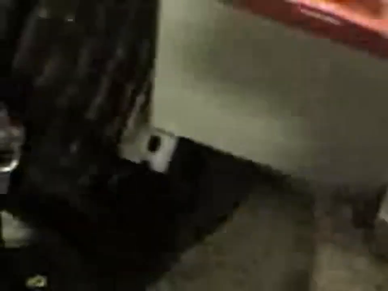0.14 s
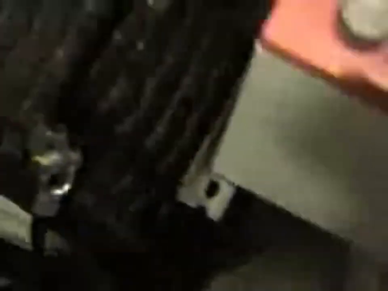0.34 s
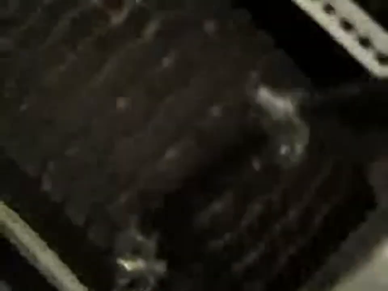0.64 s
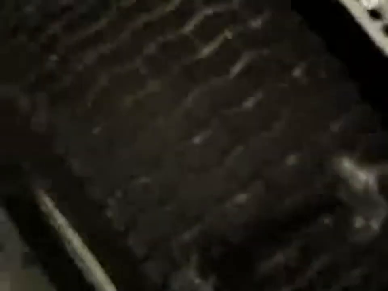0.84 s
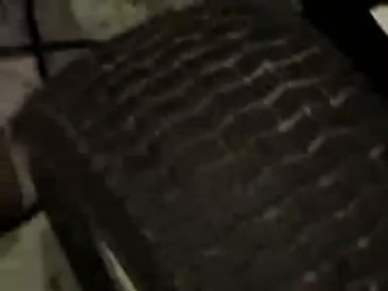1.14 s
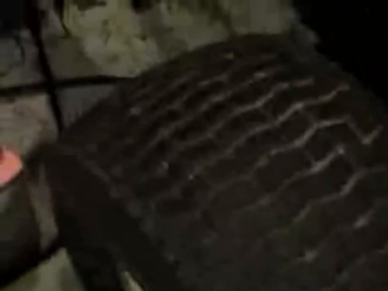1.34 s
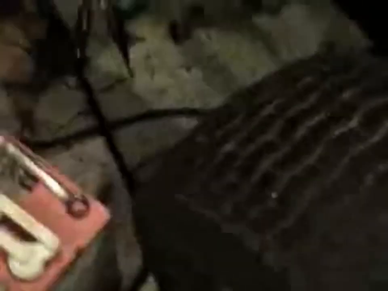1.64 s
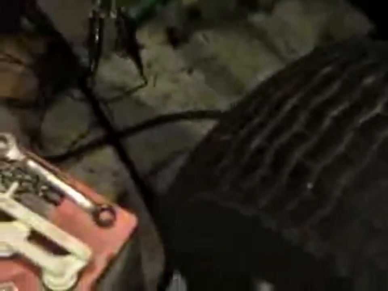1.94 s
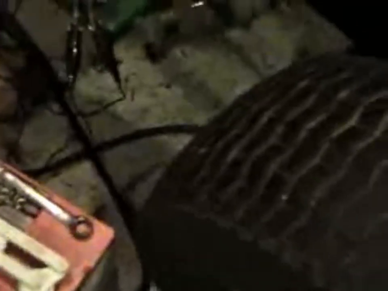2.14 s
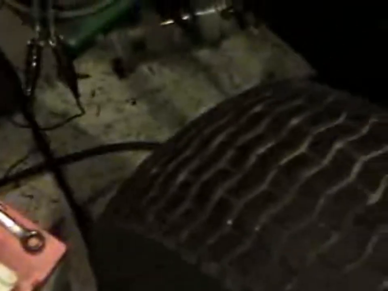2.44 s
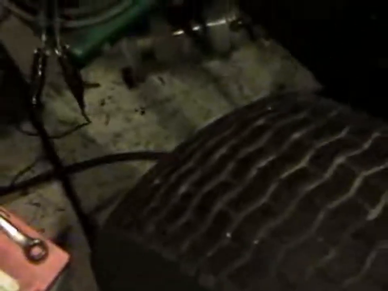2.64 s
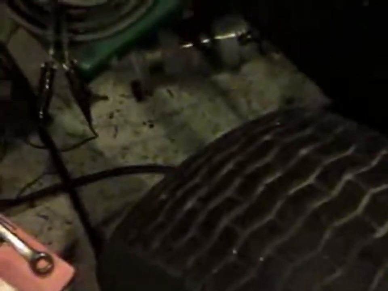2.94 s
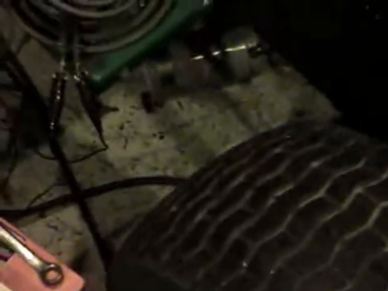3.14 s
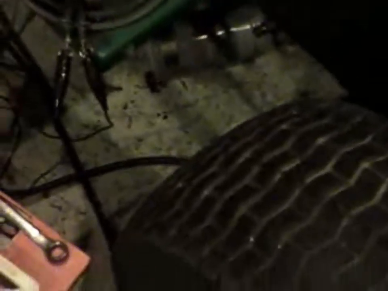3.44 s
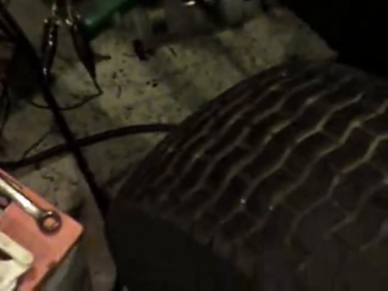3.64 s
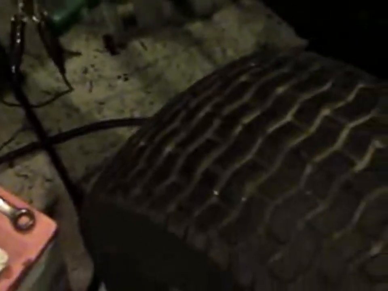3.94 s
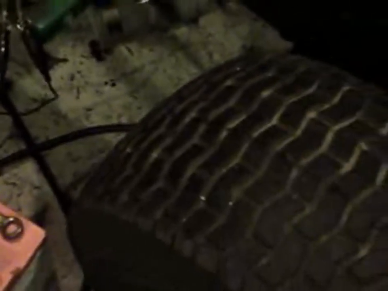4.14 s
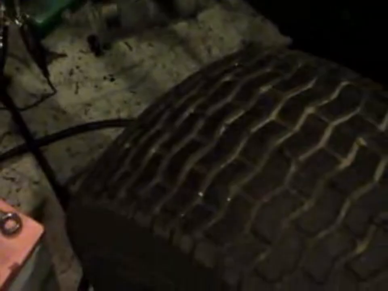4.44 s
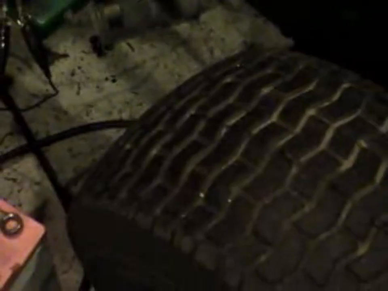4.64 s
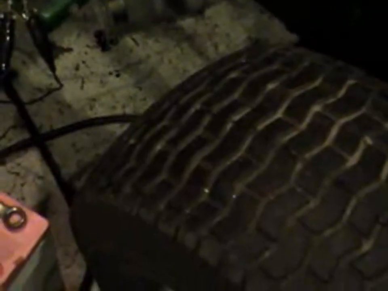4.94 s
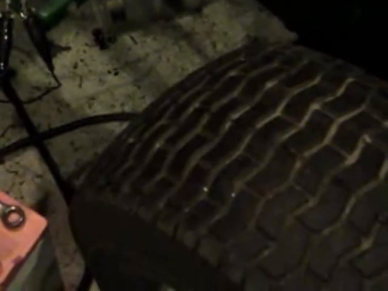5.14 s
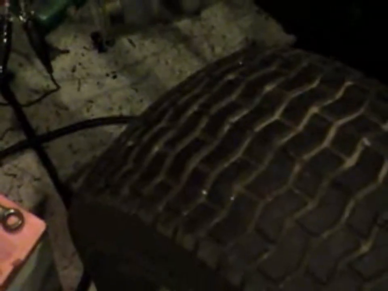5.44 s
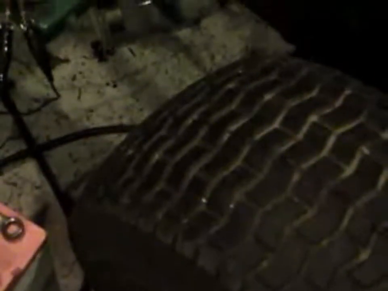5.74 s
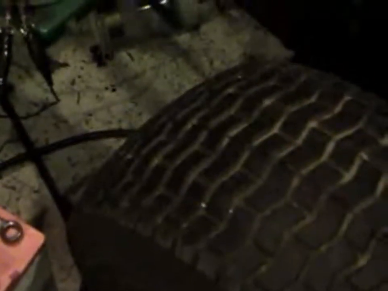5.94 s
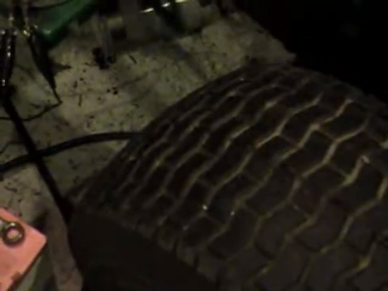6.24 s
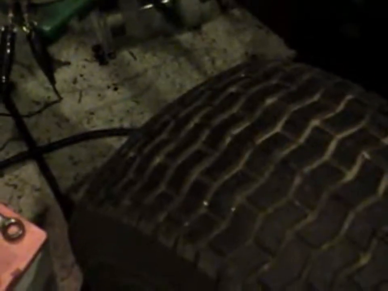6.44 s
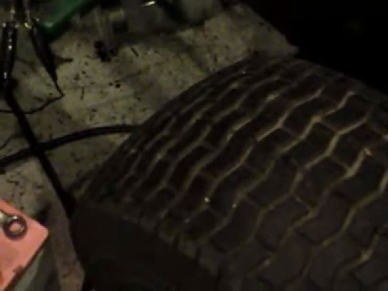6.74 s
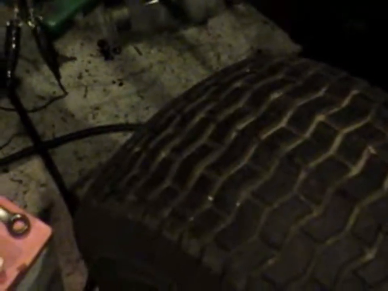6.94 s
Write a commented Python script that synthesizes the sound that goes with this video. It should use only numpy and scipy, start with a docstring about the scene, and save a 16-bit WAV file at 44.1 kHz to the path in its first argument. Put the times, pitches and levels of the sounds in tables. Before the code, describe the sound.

Close, dull-topped mono sound of a brushed motor turning slowly: mid-low hum, rubbing noise, repeated short growls, faint chirps and a few soft knocks.

```python
"""Quiet workshop: the brushed electric motor of a converted riding mower idles at about six turns a second.
Twenty armature slots pull on the poles and make a wavering hum: sines locked to the shaft angle.
Brushes rub, hiss and scuff (shaped noise), squeak near 6.2 kHz (short sines) and ring the housing (noise
through resonances), partly in a pattern that returns each turn. Short sines add a faint shimmer and brief high
chirps. A growl surges, dull knocks sound, the low mutter is at times quieter, a thrum comes and goes."""
import sys
import numpy as np
from scipy import signal
from scipy.fft import rfft, irfft, next_fast_len
from scipy.io import wavfile

SR = 44100
rng = np.random.default_rng(int(sys.argv[2]) if len(sys.argv) > 2 else 0)


def master(y):
    """Save y as 16-bit WAV."""
    cut = np.clip(np.atleast_2d(y).T, -1, 1)
    pcm = np.round(cut * 32767)  # scale
    wavfile.write(sys.argv[1], SR, pcm.astype(np.int16))


N = 313401
TIME_S = np.arange(N) / SR

# Levels are rms unless noted; "pre-trim" levels meet a fixed gain in their function.
# slot-passing rate: t/s, f/Hz
SLOT_RATE = [(0, 117.45), (1, 117.51), (5, 118.37), (6, 118.52), (6.5, 118.75), (7.11, 118.5)]
SLOTS = 20
# 3rd slot harmonic, the main note: t/s, level/dB
MAIN_NOTE = [(0.0, -39.5), (0.18, -39), (0.97, -40.5), (1.03, -36), (1.13, -39.5), (1.15, -37.5),
             (1.82, -39), (1.86, -33), (1.98, -44), (2.0, -41.5), (2.39, -38.5), (2.53, -38.5), (2.57, -50),
             (2.65, -39), (2.81, -49), (2.87, -38), (3.3, -41), (3.32, -49), (3.36, -41), (3.7, -42),
             (3.72, -38), (4.24, -42.5), (4.47, -36.5), (4.51, -43), (4.55, -37.5), (4.77, -44.5),
             (4.99, -36.5), (5.03, -51), (5.09, -40), (5.2, -38.5), (5.24, -35), (5.28, -41), (5.58, -37.5),
             (5.68, -47), (5.74, -33.5), (5.8, -47.5), (5.92, -38.5), (6.03, -50), (6.07, -40.5),
             (6.33, -39), (6.35, -53), (6.61, -37.5), (6.71, -48), (6.77, -41), (6.81, -57), (6.85, -45),
             (6.87, -43.5), (7.11, -46)]
# weaker slot harmonics: multiple of the slot rate
OVERTONES = (2, 4, 5)
# their levels as the microphone moves: t/s, 2nd, 4th and 5th harmonic level/dB (pre-trim)
OVERTONE_LEVELS = [(0, -67.5, -48, -48), (.6, -59, -47, -46), (1.4, -52.5, -67.5, -50.5),
                   (2.0, -59, -49.5, -49), (2.6, -55, -55, -51), (3.3, -54.5, -49, -50),
                   (3.9, -53, -44.5, -47.5), (4.6, -54, -56, -47.5), (5.7, -51, -55, -49.5),
                   (6.2, -52, -60, -44.5), (6.6, -49.5, -66, -51), (7.11, -61.5, -44, -48)]
# tones of the uneven armature: multiple of the shaft rate, level/dB
SHAFT_TONES = [(31, -63.5), (35, -61), (50, -63.5), (58, -63.5), (61, -73), (62, -52.5), (63, -61),
               (71, -58), (79, -57), (81, -60), (82, -61.5), (84, -50), (121, -62.5), (124, -68),
               (160, -71.5)]
# slot rate itself, throbbing once a turn; loudest at THROB_PLACE_TURNS
THROB_DB, THROB_DEPTH_DB, THROB_PLACE_TURNS = -67.5, 2, 0.091

# broad rubbing noise: f/Hz, level/(dB per Hz) (pre-trim)
RUB = [(175, -73.5), (200, -73.5), (275, -64), (400, -68), (560, -67.5), (735, -71.5), (790, -72.5),
       (825, -77.5), (890, -77), (975, -71.5), (1130, -75.5), (1250, -77.5), (1520, -74.5), (1750, -81.5),
       (2100, -82)]
# finer hiss: f/Hz, level/(dB per Hz) (pre-trim)
HISS = [(1900, -97), (2300, -86), (3100, -88), (3900, -94.5), (4400, -99.5), (5000, -97.5), (5900, -102),
        (7200, -103)]
RUB_FLUTTER_SPREAD_DB, RUB_FLUTTER_RATE_HZ = 0.5, 53

# low end of the rubbing: f/Hz, level/(dB per Hz) (pre-trim)
MUTTER = [(92, -86), (120, -76.5), (150, -74), (175, -75)]
# moments when the low noise is quieter: centre t/s, half length/s
QUIET_MOMENTS = [(.35, .015), (0.883, 0.053), (1.903, 0.011), (2.83, 0.017), (2.955, 0.017), (3.43, .035),
                 (3.96, .02), (4.062, .02), (4.18, 0.032), (4.546, .015), (4.838, 0.02), (5.283, .015),
                 (5.9, .012), (6.02, .025), (6.395, .02), (6.586, 0.036), (6.897, .035)]
QUIET_DEPTH_DB = 17.5

# shimmer chirps: the level is at each bell's peak and at the lowest pitch, falling with pitch
SHIMMER_PER_S, SHIMMER_HALF_S = 110, 0.028
SHIMMER_LOW_HZ, SHIMMER_HIGH_HZ, SHIMMER_DB, SHIMMER_FALL_DB_PER_OCTAVE = 1151.2, 4165, -55.5, 6.5
SHIMMER_SPREAD_DB, SHIMMER_GLIDE_SPREAD_HZ_PER_S = 2, 270

# housing resonances: f/Hz, width/Hz, level/dB before exposure, share repeating each turn (0-1)
HOUSING = [(322.5, 16, -57, 0.5), (366.6, 20, -55.5, 1), (443.4, 35, -52, 0), (472.2, 16, -53, 0),
           (508, 28.6, -49.5, 0.18), (530.5, 21, -46, 0), (943.7, 26, -59, 0), (1185, 51, -59, 0.9),
           (1312.5, 43, -58, 0.5), (1423, 53, -59.5, 0.05), (1914, 57, -59.5, 0.1), (2070, 40, -69, 0.01),
           (2828, 100, -72.5, 0.2), (3540, 46, -78, 0.8), (3910, 17, -76, 0.2), (4250, 46, -78, 0.5),
           (5356, 200, -70.5, 0.25)]
FLUTTER_SPREAD_DB, FLUTTER_RATE_HZ = 1.8, 20
# ringing that reaches the moving microphone: t/s, housing gain/dB, brush holder level/dB
EXPOSURE = [(0, -1, -58.5), (.5, 1, -47), (2.3, 1.5, -44.5), (4.5, 2, -46.5), (7.11, 2.5, -46)]
# commutator high spots: place/turns, half width/turns, added drag/dB re smooth drag
HIGH_SPOTS = [(0.019, 0.022, 0), (0.163, 0.035, 2.5), (.32, 0.018, -2.5), (0.549, 0.057, 3),
              (0.766, 0.032, 11.5), (0.853, 0.029, 8.5)]
HOLDER_ORDER = 182  # multiple of the shaft rate that meets the holder's resonance
HOLDER_DRAG_EXPONENT, GROWL_DRAG_EXPONENT = 0.85, 0.37

# thrum swells: half-rise t/s, length at half height/s, level/dB (pre-trim)
THRUM_SWELLS = [(0.007, 0.083, -64.5), (0.157, 0.046, -54), (0.278, 0.17, -53), (0.51, 0.074, -65),
                (0.62, 0.06, -63), (0.69, 0.03, -60), (0.758, 0.042, -56), (0.94, 0.042, -59.5),
                (1.052, 0.05, -55), (1.11, 0.04, -53), (1.46, 0.036, -57), (1.682, 0.037, -77),
                (1.78, 0.04, -59), (1.907, 0.06, -58), (2.03, 0.067, -60), (2.382, 0.053, -56),
                (2.517, 0.041, -55), (2.654, 0.07, -64), (2.774, 0.029, -57), (3.188, 0.042, -57),
                (3.31, 0.059, -62), (3.383, 0.2, -56.5), (3.745, 0.037, -56), (3.825, 0.054, -64),
                (3.92, 0.041, -53), (4.078, 0.045, -56), (4.47, 0.04, -58), (4.576, 0.08, -62),
                (5.52, 0.04, -58)]
THRUM_HZ, THRUM_EDGE_S = 64.7, 0.021
# rumble colour: f/Hz, relative level/(dB per Hz)
RUMBLE_COLOUR = [(22, -11), (45, -9), (65, -12), (92, -3)]
RUMBLE_START_DB, RUMBLE_FADE_DB_PER_S = -72, 1.2

# growl surges: peak t/s, peak rms level/dB (pre-trim), half length/s, f/Hz
SURGES = [(.162, -29, 0.015, 506), (0.443, -31, 0.02, 512), (0.488, -41, 0.017, 507),
          (0.784, -43, 0.023, 517), (1.804, -33, .035, 499), (2.03, -35.5, 0.014, 498),
          (2.108, -39, 0.015, 530), (2.488, -31, 0.014, 507), (2.532, -36, .02, 512.5),
          (2.731, -38, 0.011, 506), (3.355, -39, 0.019, 490), (3.405, -37, .018, 509),
          (3.495, -30, 0.015, 527), (3.583, -32, 0.015, 510), (3.823, -31.5, 0.025, 515),
          (4.031, -39, 0.022, 490), (4.155, -33, 0.023, 517.6), (4.37, -33.5, 0.012, 501),
          (4.503, -34.5, 0.023, 523), (4.545, -34.5, 0.013, 503), (4.875, -32, .018, 515),
          (5.01, -31, 0.016, 510.7), (5.256, -32.5, 0.025, 523), (5.397, -35, 0.031, 528),
          (5.559, -36.5, 0.014, 481), (5.868, -32.5, .014, 508), (6.112, -32.5, 0.038, 513),
          (6.2, -40, 0.019, 520), (6.409, -38, 0.019, 493), (6.523, -36.5, .022, 512.5),
          (6.613, -32, .021, 509), (6.752, -41, 0.013, 504.7), (6.881, -39, .022, 493)]
GROWL_WAVER_HZ = 12.06

# dull knocks: t/s, amplitude/dB before rise and decay
KNOCKS = [(.146, -27), (0.773, -21.5), (6.658, -24)]
KNOCK_HZ, KNOCK_RISE_S, KNOCK_DECAY_S = 486, 0.0019, 0.0059

# brush squeaks (rows near 6.2 kHz) and faint, brief high chirps (the other rows):
# peak t/s, f/Hz, level at peak/dB, half length/s
SQUEAKS_AND_CHIRPS = [(0.32, 4570, -69, .014), (0.616, 6140, -64, 0.013), (.99, 4480, -62, .014),
                      (1.018, 7070, -66, 0.015), (1.163, 4560, -61, .016), (1.404, 6700, -65, 0.018),
                      (1.48, 4750, -66, .015), (1.76, 4640, -67, 0.022), (2.121, 4680, -63, .013),
                      (2.247, 4600, -65, .014), (2.313, 4700, -62, .011), (2.441, 6170, -51, 0.011),
                      (2.458, 6260, -57, 0.025), (2.666, 4670, -72, 0.012), (2.86, 4600, -60, 0.013),
                      (3.035, 4760, -60, 0.016), (3.303, 6700, -71, .014), (3.626, 4770, -63, 0.016),
                      (3.816, 6150, -67, 0.011), (4.038, 4700, -60, .012), (4.11, 6280, -46.5, 0.0096),
                      (4.141, 6060, -56, 0.014), (4.182, 6200, -70, .025), (4.307, 4770, -68, .016),
                      (4.437, 6280, -54.5, 0.0064), (4.478, 6260, -61, 0.012), (4.612, 6100, -58, 0.0068),
                      (4.898, 4720, -67, .013), (5.117, 6200, -58, 0.011), (6.11, 4730, -62, 0.02),
                      (6.24, 4690, -61, 0.014), (6.695, 4700, -63, .014)]

# scuffs: half-rise t/s, length at half height/s, level/dB
SCUFFS = [(0.413, 0.025, -47.5), (0.566, 0.031, -40), (0.892, 0.019, -44), (1.3, 0.027, -49),
          (1.456, 0.044, -48), (1.614, .022, -47.5), (2.005, 0.02, -60), (2.085, 0.022, -41.5),
          (3.118, 0.018, -45.5), (3.675, 0.023, -48), (3.75, 0.032, -44.5), (3.92, 0.022, -45),
          (4.235, 0.031, -49), (4.766, 0.017, -44), (5.267, 0.019, -48), (5.395, 0.041, -50),
          (5.874, .02, -50.5), (6.457, .022, -43.5), (6.49, 0.038, -44.5), (7.068, 0.019, -43.5)]
# scuff colour: f/Hz, relative level/(dB per Hz)
SCUFF_COLOUR = [(600, -10), (1200, 10.5), (2300, 3.5), (3400, -5), (4300, -13.5)]
SCUFF_EDGE_S = 0.005

CUTOFF_HZ = 7270


def from_db(db):
    """Decibels to amplitude gain."""
    return 10 ** (np.asarray(db) / 20)


def rms_one(x):
    """Scale to an rms of 1."""
    return x / np.sqrt(np.mean(x ** 2) + 1e-20)


def in_time(rows):
    """Interpolate each column of a curve at every sample."""
    t_s, *columns = np.transpose(rows)
    return [np.interp(TIME_S, t_s, column) for column in columns]


def drift(rate_hz):
    """Random wander of spread 1: noise through two equal poles, run at SR / 40."""
    pole = np.exp(-2 * np.pi * rate_hz * 40 / SR)
    white = rng.standard_normal(N // 40 + 2002)
    slow = signal.lfilter([1], [1, -2 * pole, pole * pole], white)[2000:]  # skip the settling
    return np.interp(np.arange(N) / 40, np.arange(len(slow)), rms_one(slow))


def coloured(white, spectrum):
    """Give unit white noise a spectrum in dB per Hz, falling steeply beyond its ends."""
    hz, db = np.transpose(spectrum)
    size = next_fast_len(N)
    f_hz = np.maximum(np.arange(size // 2 + 1) * SR / size, 1)
    skirts = np.minimum(1, np.minimum(f_hz / hz[0], hz[-1] / f_hz)) ** 8
    density = from_db(np.interp(np.log(f_hz), np.log(hz), db))
    gain = density * skirts * np.sqrt(SR / 2)
    return irfft(rfft(white, size) * gain, size)[:N]


def patchy(x, low_hz, high_hz, spread_db, rate_hz, count):
    """Split a noise into bands, each fluttering at random."""
    size = next_fast_len(N)
    spectrum = rfft(x, size)
    f_hz = np.arange(size // 2 + 1) * SR / size
    band = np.searchsorted(np.geomspace(low_hz, high_hz, count - 1), f_hz)
    out = np.zeros(N)
    for k in range(count):
        out += irfft(spectrum * (band == k), size)[:N] * from_db(spread_db * drift(rate_hz))
    return out


def resonate(x, hz, width_hz):
    """A steep-sided resonance, already ringing at the start; rms 1."""
    edges_hz = [hz - width_hz / 2, hz + width_hz / 2]
    sos = signal.butter(2, edges_hz, "band", fs=SR, output="sos")
    primed = np.concatenate([x[-SR:], x])
    return rms_one(signal.sosfilt(sos, primed)[SR:])


def swell(peak_s, half_s):
    """A bell-shaped envelope of height 1."""
    return np.exp(-np.minimum(((TIME_S - peak_s) / half_s) ** 2 / 2, 30))


def plateau(start_s, length_s, edge_s):
    """An envelope that rises to 1, holds and falls; edges centred on start and end."""
    inside_s = np.minimum(TIME_S - start_s, start_s + length_s - TIME_S)
    return np.clip(inside_s / edge_s + .5, 0, 1)


def wavering(hz, waver_hz, rate_hz):
    """A sine whose pitch wanders at random; rms 1."""
    cycles = np.cumsum(hz + waver_hz * drift(rate_hz)) / SR
    return np.sqrt(2) * np.sin(2 * np.pi * (cycles + rng.random()))


def tone(turns, multiple, waver_db, jitter_rad):
    """A sine locked to the shaft, wavering in level and phase; rms about 1."""
    phase = 2 * np.pi * (multiple * turns + rng.random()) + jitter_rad * drift(15.0)
    return np.sqrt(2) * from_db(waver_db * drift(6.1)) * np.sin(phase)


def friction(turns, repeat):
    """White rubbing force: a share is surface roughness that returns each turn, the rest is fresh."""
    surface = rng.standard_normal(7400)  # points around one turn
    returning = surface[(turns % 1 * len(surface)).astype(int)]
    return np.sqrt(repeat) * returning + np.sqrt(1 - repeat) * rng.standard_normal(N)


def hum(turns):
    """Each slot tugs on the poles as it passes; unequal slots add shaft tones and a low throb."""
    main_db, = in_time(MAIN_NOTE)
    main = from_db(main_db) * tone(turns, SLOTS * 3, waver_db=0.5, jitter_rad=0.2)
    overtones = sum(from_db(db) * tone(turns, SLOTS * k, waver_db=2.0, jitter_rad=0.65)
                    for k, db in zip(OVERTONES, in_time(OVERTONE_LEVELS)))
    uneven = sum(from_db(db) * tone(turns, k, waver_db=0.5, jitter_rad=0.32) for k, db in SHAFT_TONES)
    throb_db = THROB_DB + THROB_DEPTH_DB * np.cos(2 * np.pi * (turns - THROB_PLACE_TURNS))
    throb = from_db(throb_db) * tone(turns, SLOTS, waver_db=3.0, jitter_rad=0.92)
    return main + from_db(0.1) * overtones + uneven + throb


def brushes(turns):
    """A broad rub and a finer hiss, each band fluttering at random."""
    rub = patchy(coloured(friction(turns, repeat=0.11), RUB),
                 low_hz=176.4, high_hz=1803, spread_db=1.35, rate_hz=12, count=16)
    hiss = patchy(coloured(friction(turns, repeat=0.039), HISS),
                  low_hz=2137, high_hz=6900, spread_db=2.5, rate_hz=9, count=32)
    flutter = from_db(RUB_FLUTTER_SPREAD_DB * drift(RUB_FLUTTER_RATE_HZ))
    return flutter * (from_db(0.87) * rub + from_db(-1.0) * hiss)


def mutter(turns):
    """Low end of the rubbing, part drone and part noise, uneven in level, with quieter moments."""
    quiet_db = QUIET_DEPTH_DB * sum(swell(t_s, half_s) for t_s, half_s in QUIET_MOMENTS)
    drone = from_db(-61.5) * wavering(hz=119.6, waver_hz=16, rate_hz=30)
    noise = from_db(-2.5) * coloured(friction(turns, repeat=0.039), MUTTER)
    return from_db(1.0 * drift(23) - quiet_db) * (drone + noise)


def shimmer():
    """A faint shimmer of many short, overlapping, randomly placed chirps, each gliding in pitch."""
    count = SHIMMER_PER_S * N // SR
    t_s = np.arange(-SR // 8, SR // 8) / SR
    bell = np.exp(-(t_s / SHIMMER_HALF_S) ** 2 / 2)
    out = np.zeros(N + len(t_s))
    places = rng.random((count, 3))
    spreads = np.clip(rng.standard_normal((count, 2)), -2, 2)
    for (when, place, phase), (size, glide) in zip(places, spreads):
        octaves = place * np.log2(SHIMMER_HIGH_HZ / SHIMMER_LOW_HZ)
        hz = SHIMMER_LOW_HZ * 2 ** octaves
        glide_hz_per_s = glide * SHIMMER_GLIDE_SPREAD_HZ_PER_S
        cycles = hz * t_s + glide_hz_per_s * t_s ** 2 / 2 + phase
        level_db = SHIMMER_DB - SHIMMER_FALL_DB_PER_OCTAVE * octaves + SHIMMER_SPREAD_DB * size
        start = int(when * N)
        out[start:start + len(t_s)] += np.sqrt(2) * from_db(level_db) * bell * np.sin(2 * np.pi * cycles)
    return out[len(t_s) // 2:][:N]


def housing(turns):
    """Rubbing keeps the motor's shell and mounting ringing, each resonance fluttering on its own."""
    out = np.zeros(N)
    for hz, width_hz, db, repeat in HOUSING:
        flutter = from_db(FLUTTER_SPREAD_DB * drift(FLUTTER_RATE_HZ))
        out += from_db(db) * rms_one(flutter * resonate(friction(turns, repeat), hz, width_hz))
    return out


def drag(turns):
    """Force on the brushes: 1 on the smooth commutator, swelling at each high spot."""
    force = 1
    for place, half, db in HIGH_SPOTS:
        offset_turns = (turns - place + .5) % 1 - .5
        force = force + from_db(db) * np.exp(-(offset_turns / half) ** 2 / 2)
    return force


def brush_holder(turns):
    """High spots make the holder sing in the same uneven throb on every turn; rms 1."""
    singing = tone(turns, HOLDER_ORDER, waver_db=0.5, jitter_rad=1.18)
    rasp = resonate(friction(turns, repeat=0.45), hz=1063.4, width_hz=75)
    return rms_one(drag(turns) ** HOLDER_DRAG_EXPONENT * (singing + from_db(-3.0) * rasp))


def thrum():
    """A low wavering sine in separate swells over a faint, slowly fading noise rumble."""
    swells = sum(from_db(db) * plateau(t_s, length_s, THRUM_EDGE_S) for t_s, length_s, db in THRUM_SWELLS)
    rumble_db = RUMBLE_START_DB - RUMBLE_FADE_DB_PER_S * TIME_S + 3.6 * drift(9)
    rumble = from_db(rumble_db) * rms_one(coloured(rng.standard_normal(N), RUMBLE_COLOUR))
    return from_db(-2.0) * swells * wavering(THRUM_HZ, waver_hz=12, rate_hz=20) + rumble


def growl(turns):
    """A housing resonance builds again and again into a wavering sine, roughened by the drag."""
    level = sum(from_db(db) * swell(t_s, half_s) for t_s, db, half_s, _ in SURGES)
    pitch_hz, = in_time([(t_s, hz) for t_s, _, _, hz in SURGES])
    roughness = rms_one(drag(turns) ** GROWL_DRAG_EXPONENT)
    return from_db(-3.0) * level * roughness * wavering(pitch_hz, GROWL_WAVER_HZ, rate_hz=47.4)


def knocks():
    """Play in the drive gives a dull knock: a sine that dies within a few cycles."""
    out = np.zeros(N)
    for t_s, db in KNOCKS:
        age_s = np.clip(TIME_S - t_s, 0, 1)
        envelope = np.minimum(age_s / KNOCK_RISE_S, 1) * np.exp(-age_s / KNOCK_DECAY_S)
        out += from_db(db) * envelope * np.sin(2 * np.pi * KNOCK_HZ * age_s)
    return out


def squeaks_and_chirps():
    """Short sines of unsteady, raspy pitch: stick-slip brush squeaks near 6.2 kHz, else faint high chirps."""
    wobble_cycles = np.cumsum(75 * drift(300)) / SR  # pitch spread 75 Hz
    out = np.zeros(N)
    for t_s, hz, db, half_s in SQUEAKS_AND_CHIRPS:
        sine = np.sin(2 * np.pi * (hz * TIME_S + wobble_cycles))
        out += np.sqrt(2) * from_db(db) * swell(t_s, half_s) * sine
    return out


def scuffs():
    """Short, abrupt bursts of brighter, gritty rubbing noise."""
    grit = from_db(2.1 * drift(250))
    scrape = rms_one(coloured(rng.standard_normal(N), SCUFF_COLOUR) * grit)
    return scrape * sum(from_db(db) * plateau(t_s, length_s, SCUFF_EDGE_S) for t_s, length_s, db in SCUFFS)


def scene():
    """Sum all layers; the shaft-locked ones share one shaft angle."""
    slot_hz, = in_time(SLOT_RATE)
    turns = np.cumsum(slot_hz / SLOTS) / SR
    housing_db, holder_db = in_time(EXPOSURE)
    steady = hum(turns) + brushes(turns) + mutter(turns) + shimmer() + thrum()
    ringing = from_db(housing_db) * housing(turns) + from_db(holder_db) * brush_holder(turns)
    mix = steady + ringing + growl(turns) + knocks() + squeaks_and_chirps() + scuffs()
    return mix[None]  # one channel


def record(dry):
    """Narrow-band mono pickup: a steep elliptic low-pass cuts the top."""
    sos = signal.ellip(12, .1, 80, CUTOFF_HZ, fs=SR, output="sos")
    return signal.sosfilt(sos, dry)


dry = scene()
out = record(dry)
master(out)
```